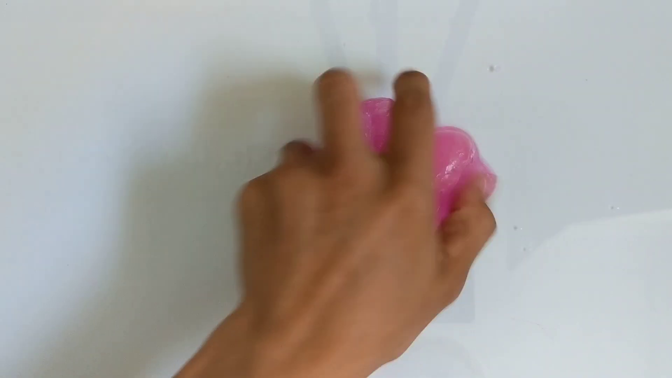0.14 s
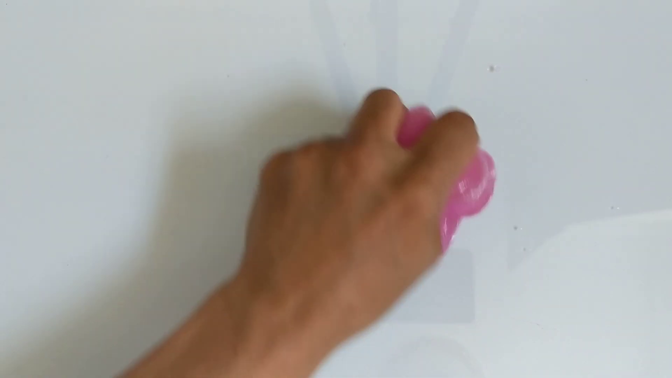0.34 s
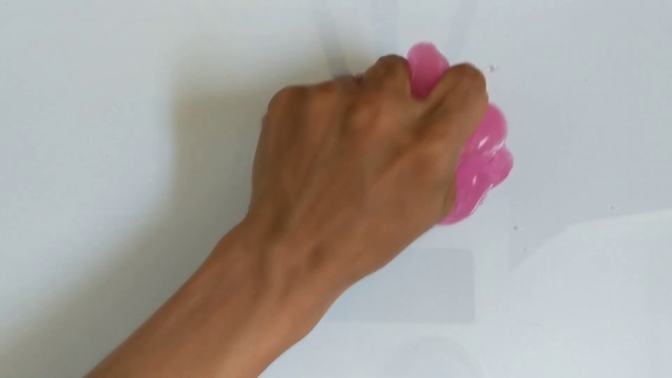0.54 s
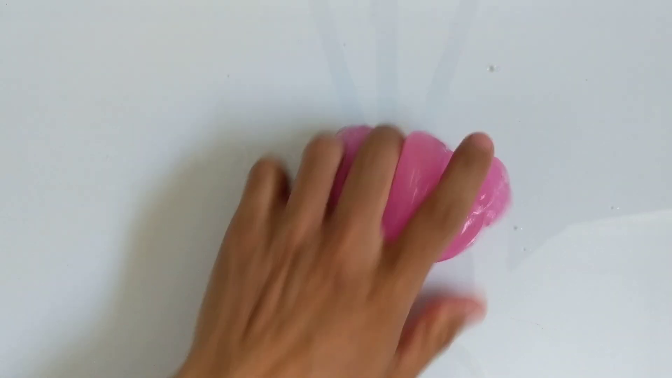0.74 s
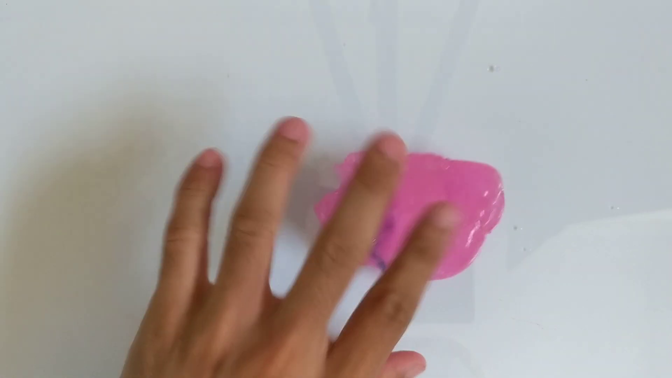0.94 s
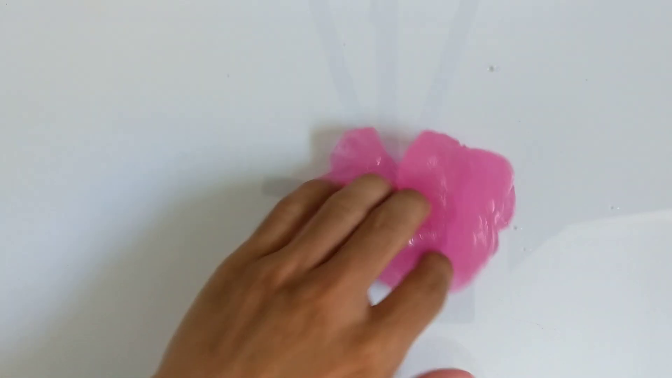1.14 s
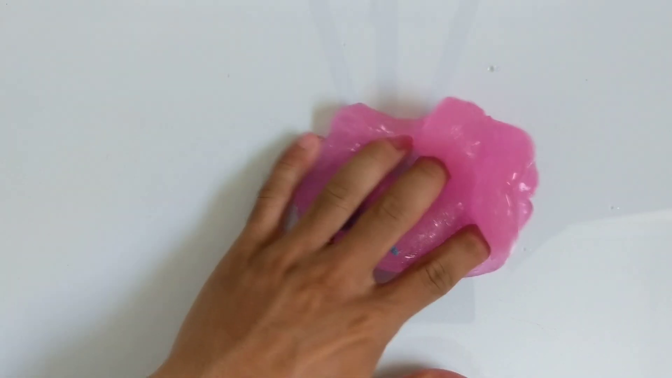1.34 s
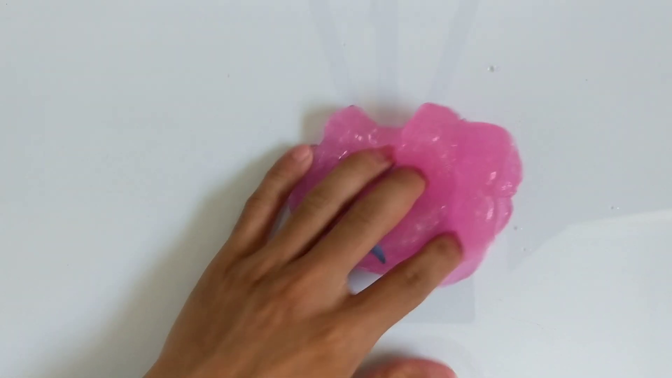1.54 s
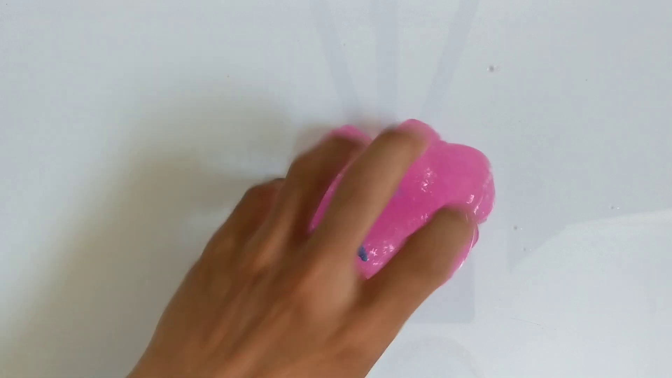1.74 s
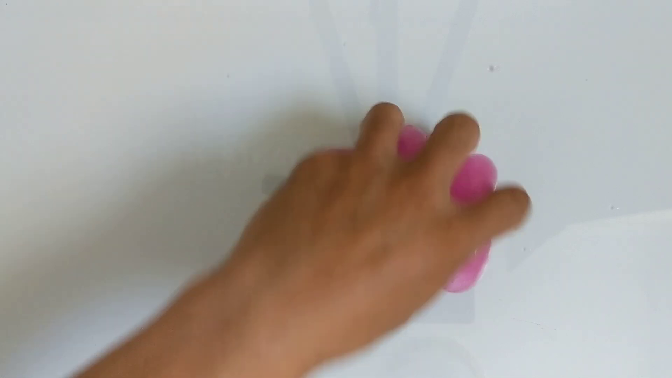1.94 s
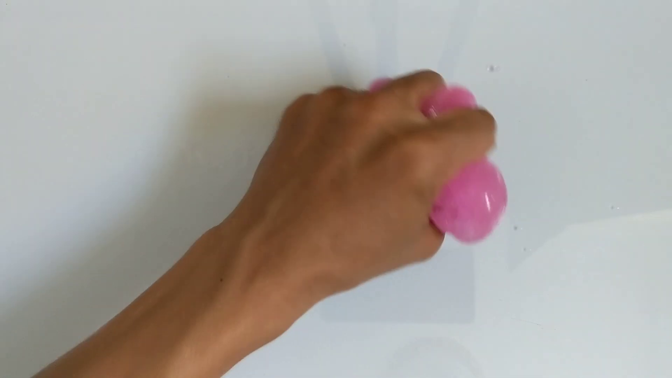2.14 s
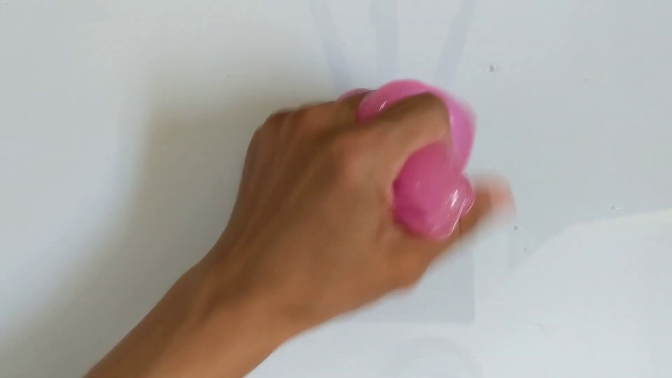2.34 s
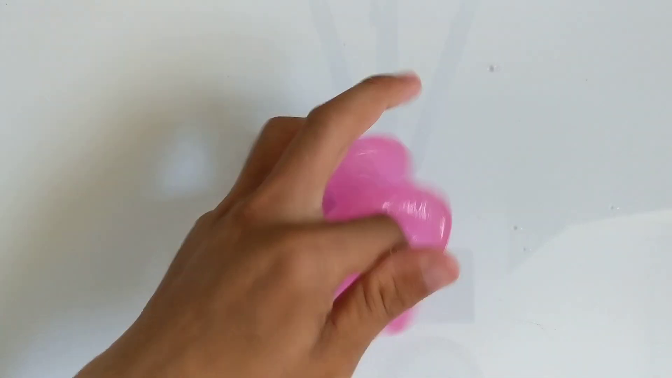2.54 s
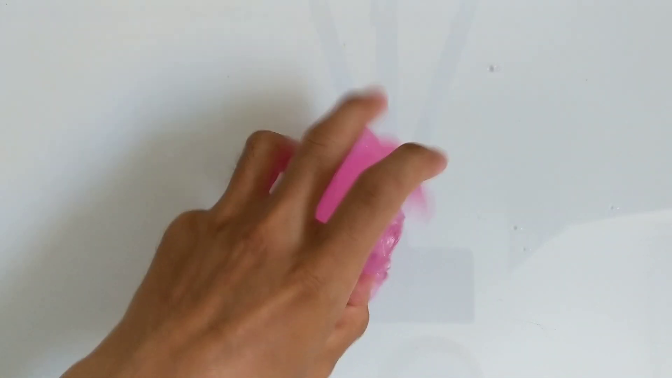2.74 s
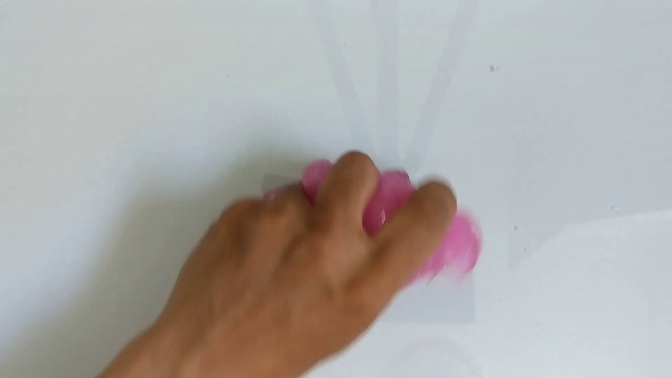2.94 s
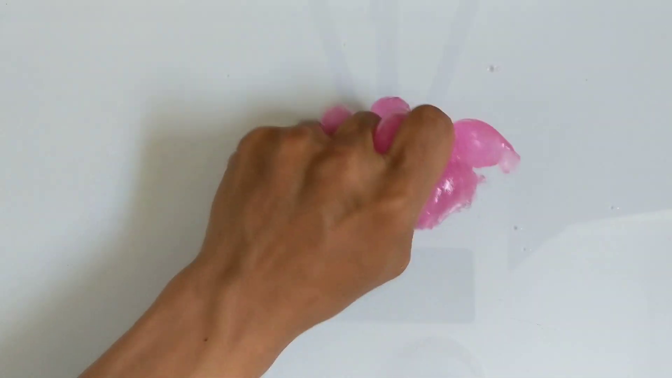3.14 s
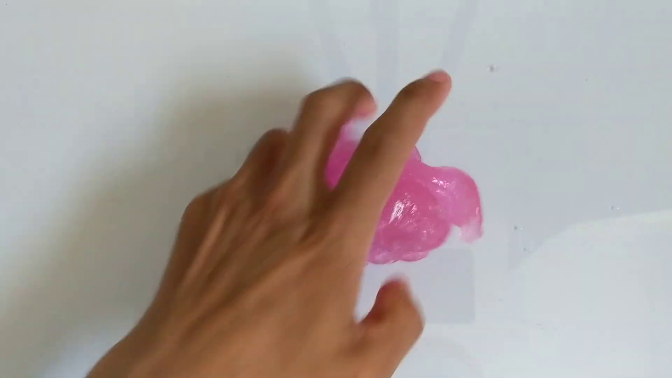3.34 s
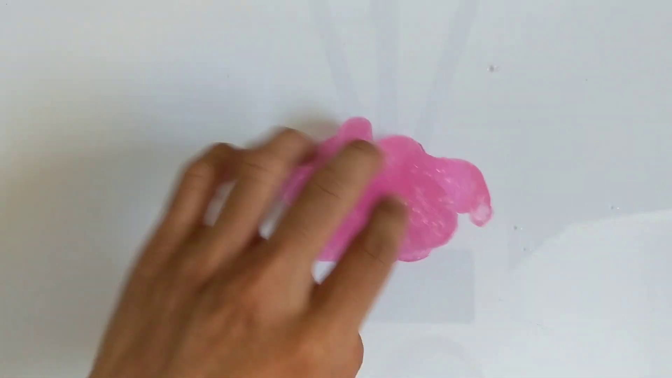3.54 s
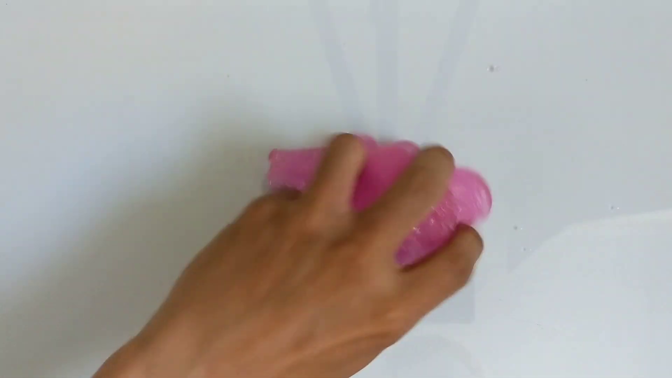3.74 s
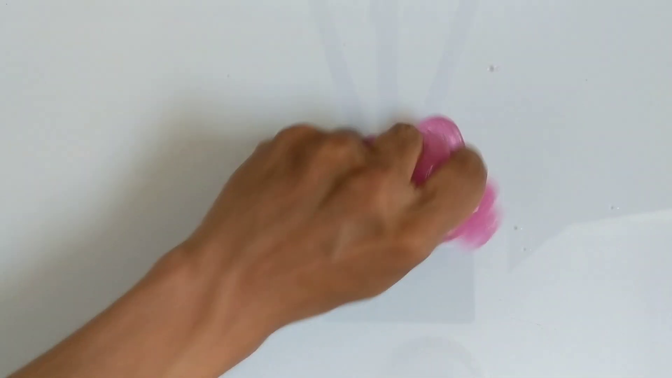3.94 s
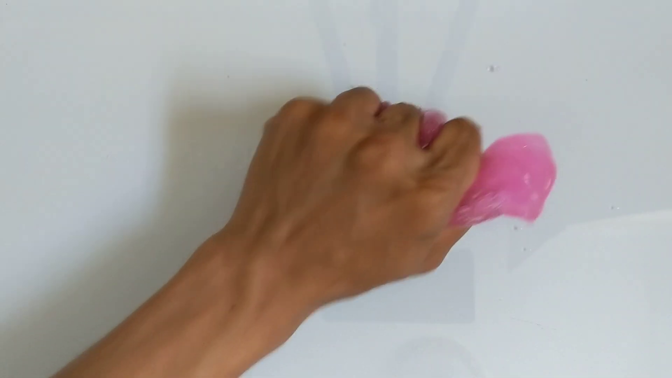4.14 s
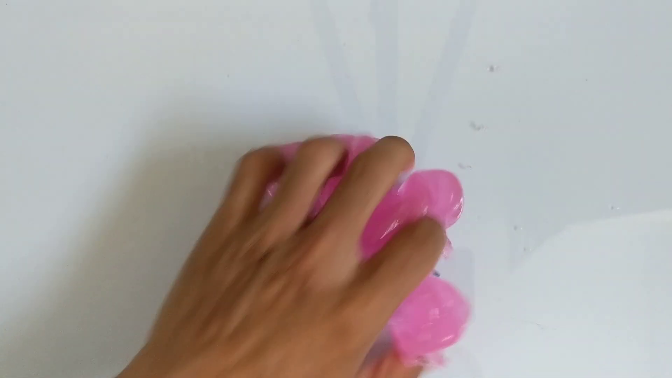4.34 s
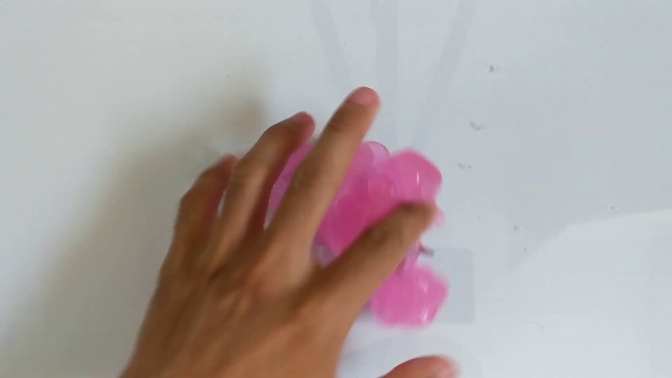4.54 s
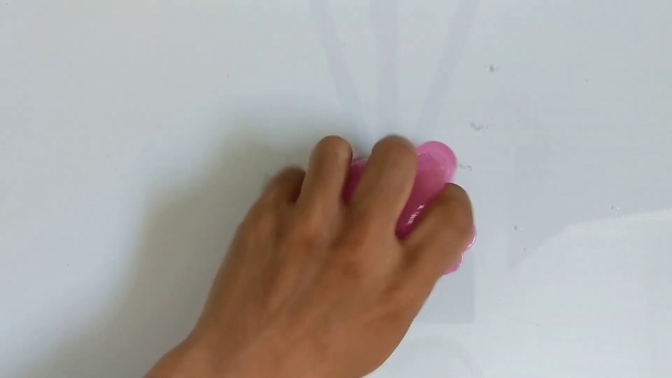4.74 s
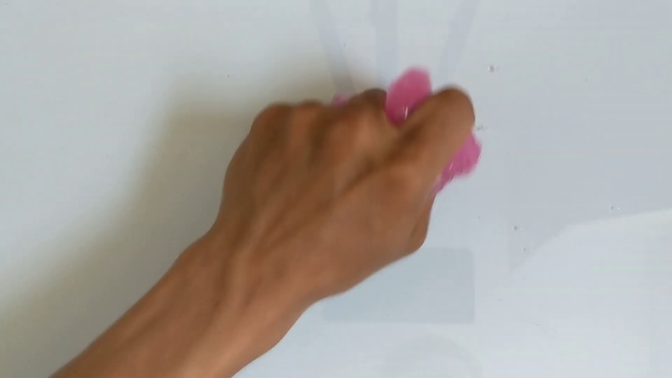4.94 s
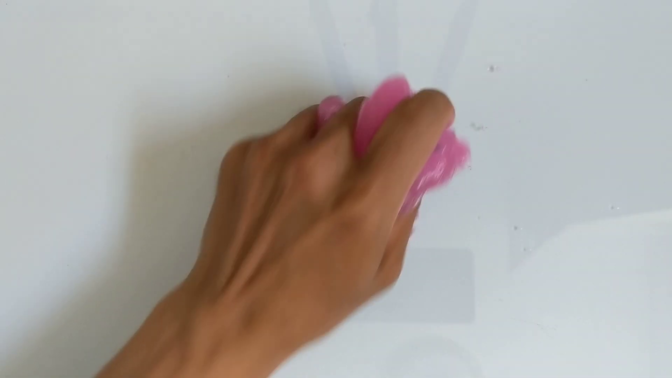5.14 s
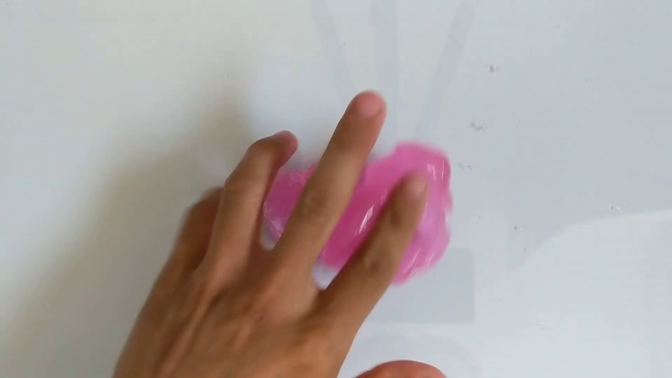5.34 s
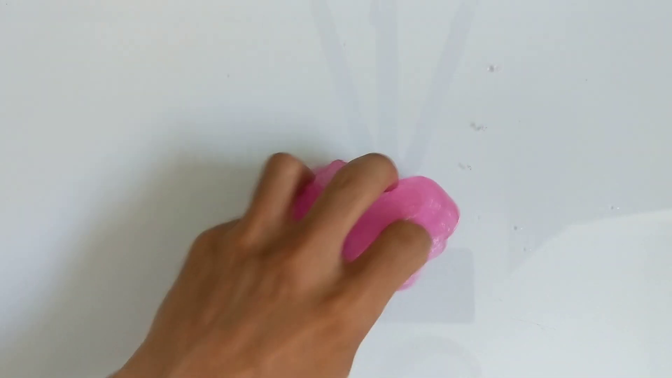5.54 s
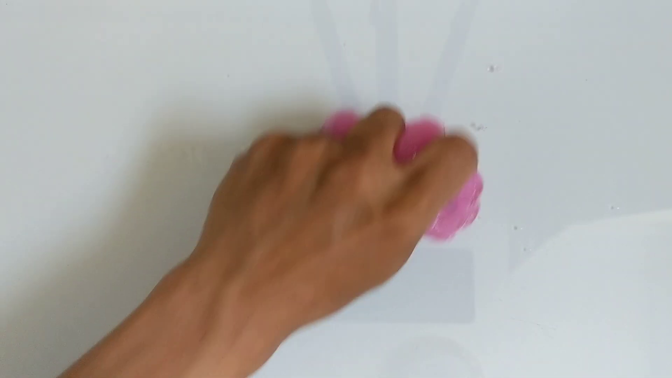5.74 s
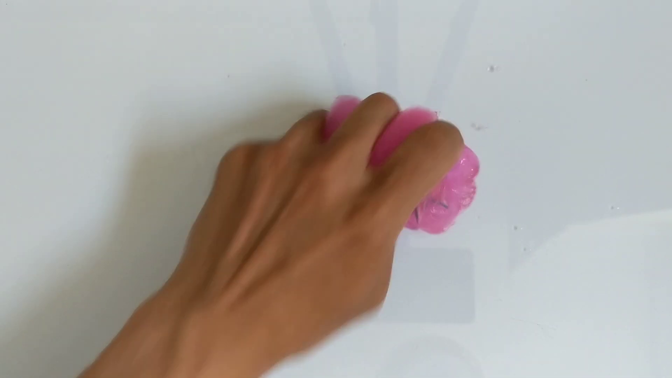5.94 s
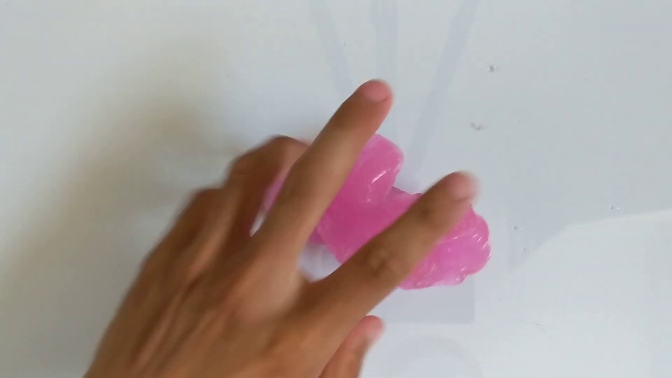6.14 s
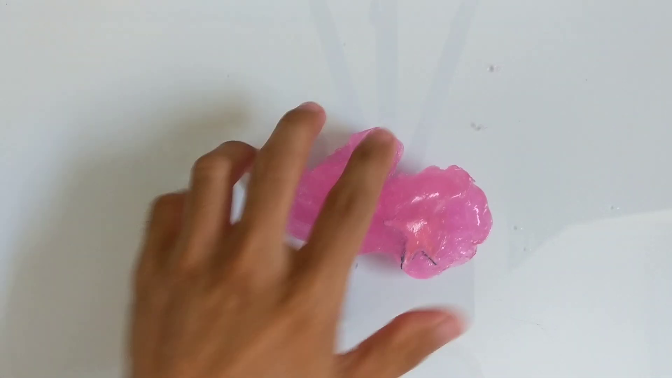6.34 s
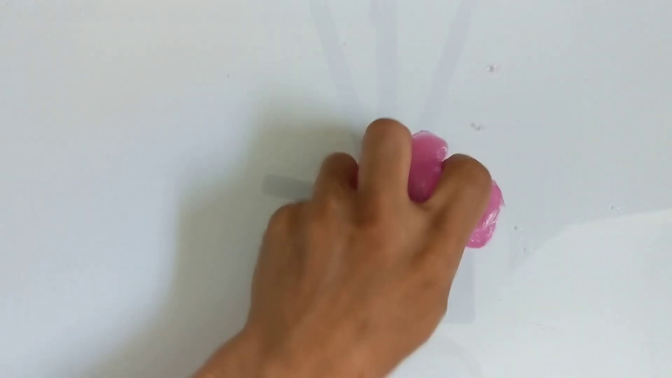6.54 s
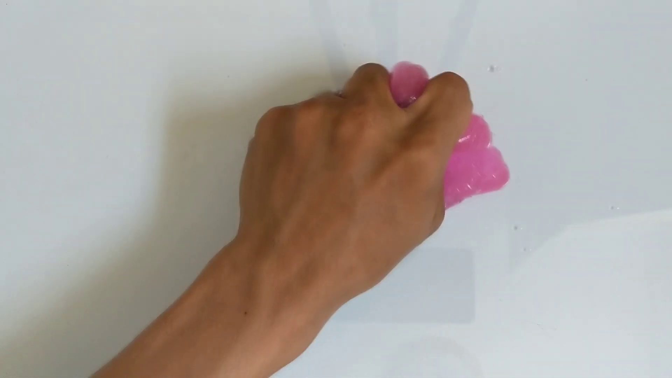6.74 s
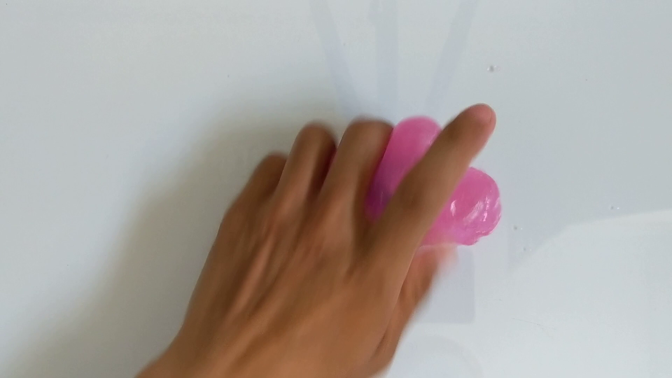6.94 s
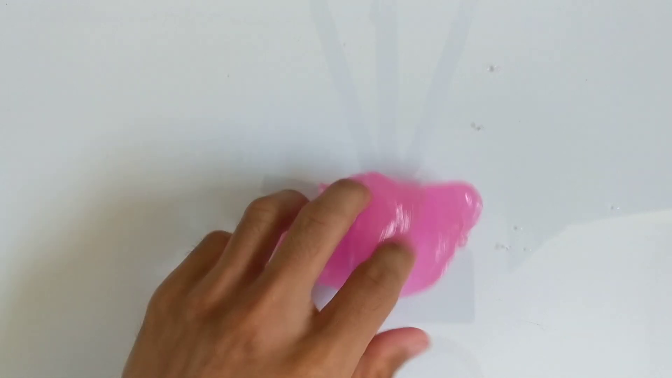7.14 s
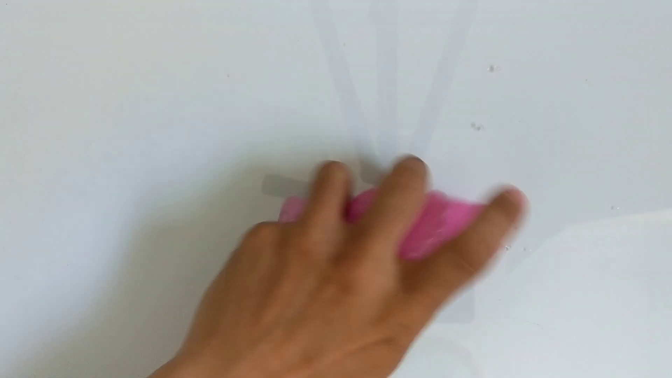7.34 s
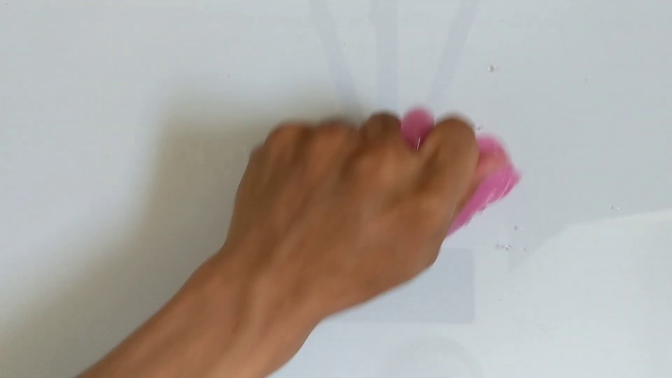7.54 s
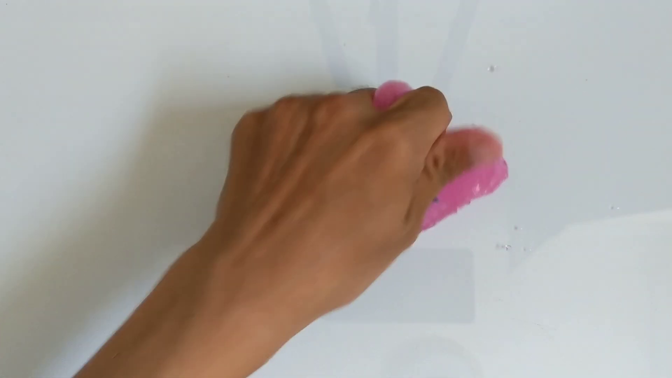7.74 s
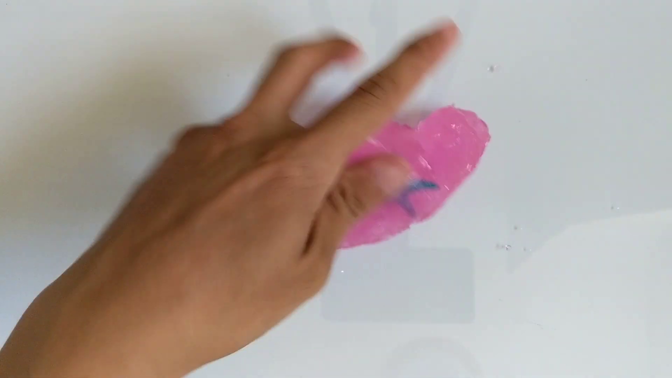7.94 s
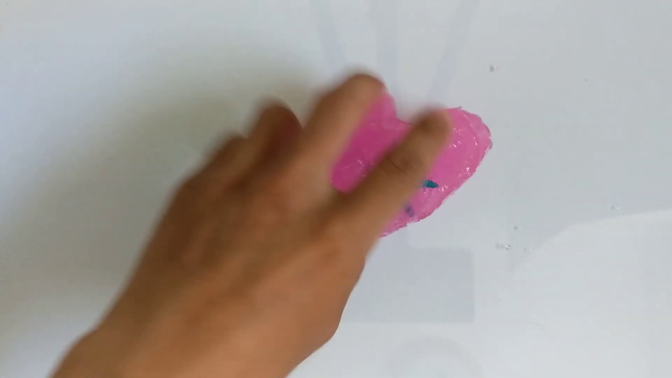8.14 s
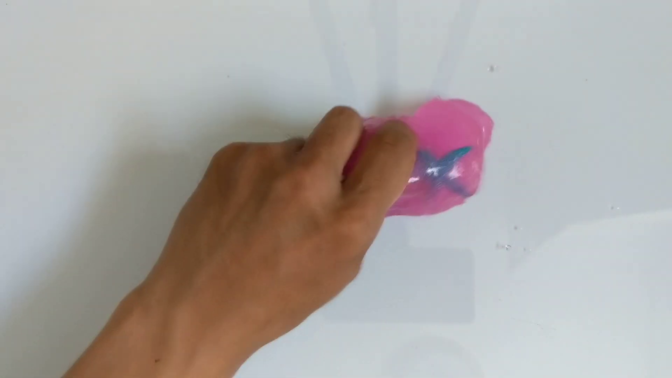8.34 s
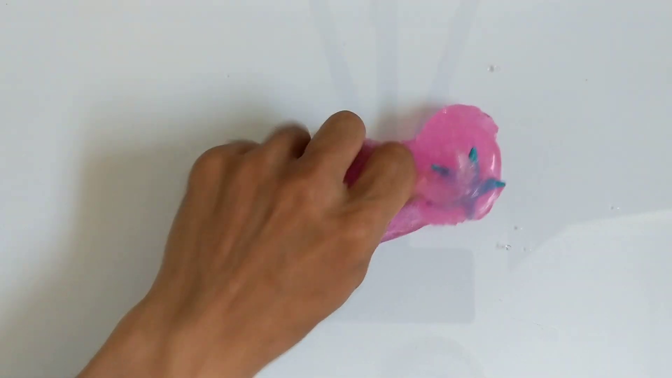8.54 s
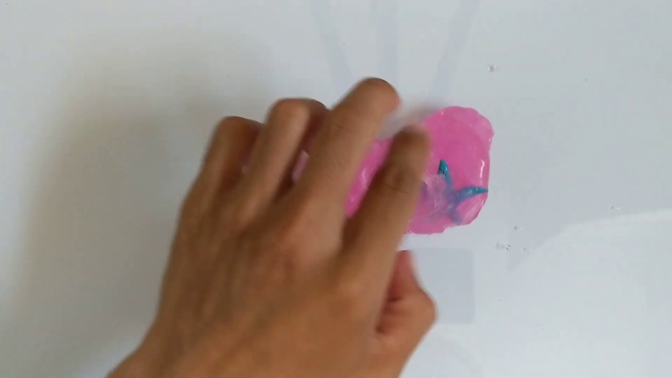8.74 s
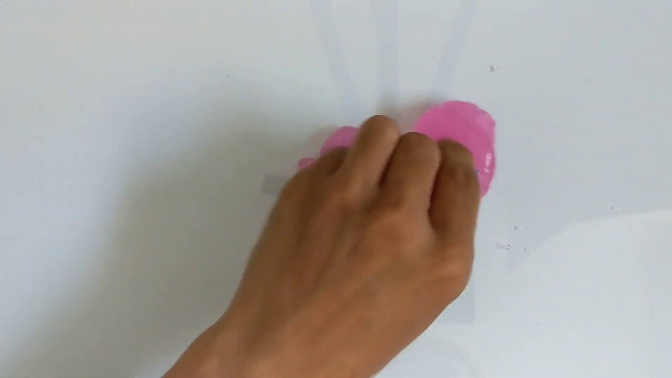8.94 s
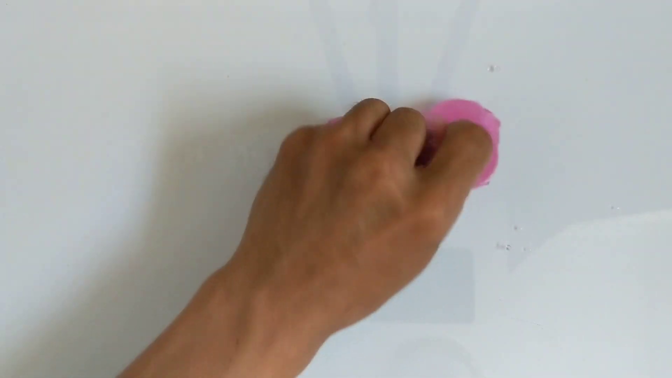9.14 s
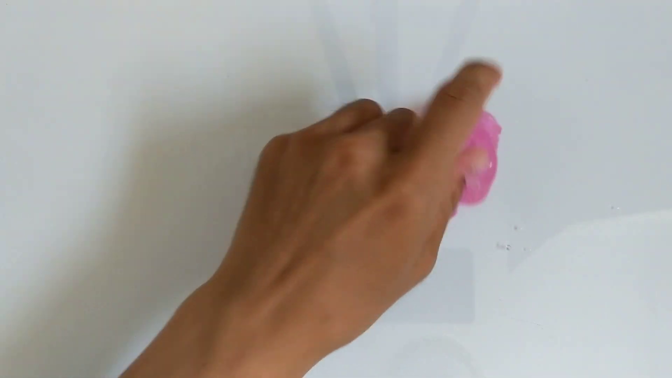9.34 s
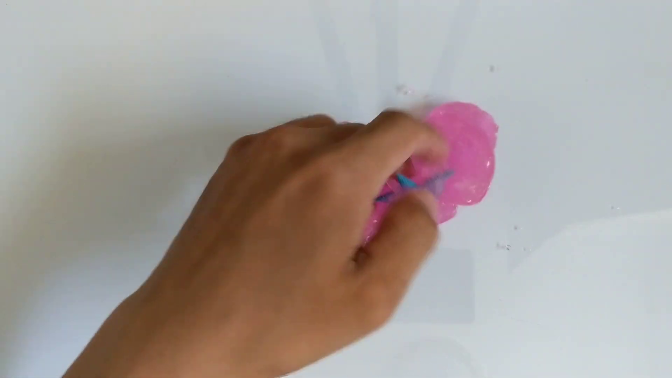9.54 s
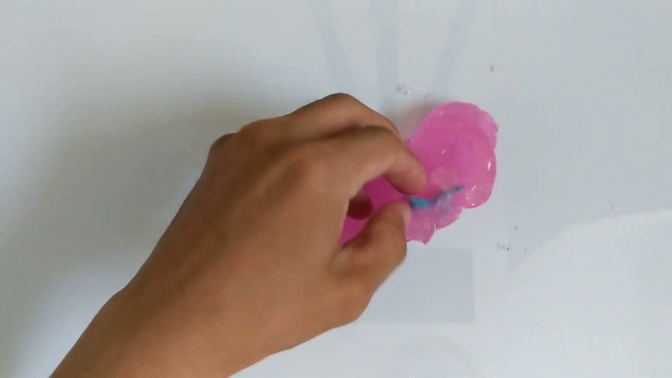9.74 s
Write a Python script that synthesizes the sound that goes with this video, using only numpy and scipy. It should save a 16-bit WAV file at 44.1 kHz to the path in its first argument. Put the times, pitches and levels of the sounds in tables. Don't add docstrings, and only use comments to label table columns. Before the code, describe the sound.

Fingers knead wet sticky slime on a hard table, trapped air bubbles bursting in sharp irregular pops and clicks over squelchy crackle in a bare room.

```python
import sys
import numpy as np
from scipy import signal
from scipy.fft import rfft, irfft, next_fast_len
from scipy.io import wavfile
from scipy.ndimage import map_coordinates

SR = 44100
rng = np.random.default_rng(int(sys.argv[2]) if len(sys.argv) > 2 else 0)


def digitize_waveform(pressure):
    field = np.atleast_2d(pressure).T
    bounded = np.clip(field, -1, 1)
    quanta = np.round(bounded * 32767).astype(np.int16)
    wavfile.write(sys.argv[1], SR, quanta)


def gain_from_decibels(decibels):
    exponent = np.asarray(decibels, float) / 20
    return 10 ** exponent


N = 435266


def unit(x):
    return x / np.sqrt(np.mean(x ** 2) + 1e-20)


def along(points, hz):
    f, v = np.transpose(points)
    return np.interp(np.log(hz + 1), np.log(f + 1), v)


def wobble(rate_hz):
    knots = rng.standard_normal(int(N * rate_hz / SR) + 4)
    return map_coordinates(knots, [np.arange(N) * rate_hz / SR])


def coloured(x, spectrum):
    m = next_fast_len(N + 8192)
    gain = gain_from_decibels(along(spectrum, np.fft.rfftfreq(m, 1 / SR)))
    return irfft(rfft(x, m) * gain, m)[:N]


def bursts(s, db, hz, cycles, rise, onset, size):
    db, hz, cycles = (np.broadcast_to(v, len(s))[:, None] for v in (db, hz, cycles))
    turns = hz * np.arange(size) / SR
    wave = np.sin(2 * np.pi * turns * (1 + rise * turns / cycles))
    wave *= 1 - np.exp(-(turns / onset) ** 2)
    wave *= gain_from_decibels(db - 60 * turns / cycles)
    wave *= np.hanning(2 * size)[size:]
    at = (s * SR).astype(int)[:, None] + np.arange(size)
    return np.bincount(at.ravel(), wave.ravel(), N + SR)[:N]


# (t/s, peak level/dB, f/Hz, ring/cycles, second chamber f/Hz)
SPLIT_POPS = [(1.371, -25, 1170, 2.9, 4670), (1.395, -21, 2980, 5, 5800), (1.4652, -19.5, 5150, 5.5, 8940),
              (2.2517, -28, 6440, 7.8, 10700), (2.442, -36.5, 2760, 7.2, 6930),
              (3.092, -33, 3800, 15, 2010), (3.1003, -17, 4300, 4.2, 6500), (3.102, -19, 4100, 4.2, 6000),
              (3.998, -15, 6470, 4.2, 9450), (4.0828, -22.5, 4960, 6, 2600), (4.09, -31, 5200, 5, 2700),
              (4.176, -31, 11330, 5.6, 6630), (4.91, -18, 3210, 5.5, 5400), (4.919, -30, 3010, 5.1, 4910),
              (5.8278, -17, 4260, 2.06, 1410), (6.571, -29.5, 7190, 2.05, 1050),
              (6.941, -33, 6750, 11.6, 4470), (6.9733, -29, 1180, 6.7, 3140),
              (7.0037, -32, 2600, 6.8, 7600), (7.585, -13.5, 4470, 3.9, 7800),
              (7.644, -17, 2180, 2.26, 5800), (7.6675, -23, 7400, 6, 3920), (6.9796, -25, 1200, 5, 2550),
              (6.9805, -25, 2800, 8, 2500), (3.9996, -17, 6500, 3.5, 9600), (7.5866, -15, 4900, 3.5, 7700),
              (4.9117, -23, 3100, 5, 5500), (4.0405, -25, 4200, 7, 2300), (8.5025, -31, 1700, 2.5, 3300),
              (1.3695, -33, 3100, 4, 6200), (3.982, -28, 3000, 3, 6000), (7.6692, -26, 7500, 5, 4000),
              (6.981, -29, 670, 2.5, 1230)]
# (t/s, peak level/dB, f/Hz, ring/cycles, side chamber f/Hz)
SIDE_POPS = [(0.3828, -26, 7000, 4.4, 3400), (0.7656, -23, 1380, 7.9, 2860), (0.7704, -34, 744, 3, 1410),
             (2.2103, -7.5, 3470, 1.93, 2170), (2.2248, -27, 3300, 2.4, 6030),
             (2.4849, -24.5, 7400, 2.6, 1050), (3.1621, -34, 6200, 5.0, 2930),
             (3.1738, -26.5, 2630, 4.2, 4350), (4.0388, -22, 4180, 7.7, 2220), (4.25, -31, 10100, 13, 5860),
             (4.859, -22.5, 1400, 6.5, 1050), (4.96, -31, 7300, 7.2, 3250), (5.03, -16.5, 2920, 1.3, 1540),
             (5.0721, -23, 3120, 1.9, 4940), (5.7872, -22, 5240, 7, 4500), (6.0692, -23.5, 6760, 2.5, 1390)]
# (t/s, peak level/dB, f/Hz, ring/cycles)
ROUND_POPS = [(1.4178, -30, 9000, 6.1), (1.3945, -25.5, 10400, 9.5), (1.4227, -22, 6200, 4.5),
              (1.4695, -25, 7700, 3.8), (2.242, -29.5, 6000, 18), (2.2828, -16.5, 7060, 4.2),
              (2.291, -31, 6630, 9.4), (3.1967, -20, 9200, 4), (3.199, -32.5, 2560, 5.4),
              (1.4652, -29, 12500, 9), (1.4702, -30, 12000, 9), (2.2106, -28, 12500, 9),
              (1.359, -36, 12000, 5), (4.9072, -33, 9000, 5), (4.919, -33, 8200, 6), (4.955, -35, 7500, 6),
              (4.996, -35, 7800, 6), (3.955, -35, 5500, 9), (6.9812, -32, 3100, 18), (6.9808, -27, 6900, 6),
              (8.5012, -33, 10000, 6), (8.5055, -30, 4450, 6), (8.509, -35, 10500, 6),
              (6.9795, -29, 2490, 18), (6.9775, -30, 1110, 14), (8.411, -38, 8000, 4),
              (8.348, -44, 3900, 10), (9.403, -42, 5000, 5), (3.9547, -25, 2740, 9.5),
              (3.9777, -14.5, 2290, 2.05), (4.1333, -27, 7800, 4), (4.9675, -35, 6100, 5.9),
              (5.792, -30, 5000, 6.2), (5.7708, -31, 8800, 7), (5.7752, -30, 8200, 7),
              (5.8475, -28, 1850, 2), (7.717, -25, 2150, 2.2), (8.4998, -25, 6000, 3.7),
              (8.5032, -26, 7200, 4), (2.1056, -39, 1940, 3.6), (2.1256, -35.5, 2760, 4),
              (5.2654, -42, 1310, 4.3), (5.4844, -32.5, 1250, 1.9), (6.1494, -43, 1860, 6.7),
              (9.2694, -43, 3500, 9.4), (9.1561, -46, 7150, 6), (6.2083, -41, 5020, 5.1),
              (9.2264, -28, 8240, 14)]
SPLIT_DB, SIDE_DB, ROUND_DB = 6.5, -0.5, -11
ROUND_RATIO = 0.55


def pockets():
    split = [row + (SPLIT_DB,) for row in SPLIT_POPS]
    side = [row + (SIDE_DB,) for row in SIDE_POPS]
    plain = [row + (ROUND_RATIO * row[2], ROUND_DB) for row in ROUND_POPS]
    return np.transpose(split + side + plain)


def pops():
    s, db, hz, cycles, second_hz, second_db = pockets()
    main = bursts(s, db + 3.5, hz, 1.61 * cycles, rise=0.0062, onset=0.53, size=500)
    second = bursts(s, db + second_db - 7.5, second_hz, 2.44 * cycles, rise=0.0095, onset=0.77, size=500)
    snap = bursts(s, db - 15.5, np.minimum(2 * hz, 12000), 9.9, rise=0, onset=0.66, size=60)
    push = bursts(s, db - 25, 650, 5.3, rise=0, onset=0.44, size=300)
    return main + second + snap + push


# (t/s, peak level/dB, f/Hz, ring/cycles)
SMACKS = [(0.266, -34.5, 6900, 4), (0.7477, -25, 1280, 3.9), (0.7612, -21, 4500, 2.7),
          (1.2978, -28, 4140, 2.6), (1.66, -31, 2900, 3.2), (2.027, -28, 7140, 3.3), (2.0659, -35, 9100, 4),
          (2.98, -14, 2300, 2.4), (3.0767, -21, 4700, 3.6), (3.8588, -29, 1250, 4.7),
          (3.9123, -33, 4200, 3.6), (3.9618, -30, 2990, 3.8), (4.4918, -27.5, 4770, 5.2),
          (5.7613, -30, 1580, 6.4), (6.0568, -15.5, 1380, 3.9), (6.064, -11.5, 5830, 1),
          (6.4968, -32, 1060, 5.3), (6.6415, -28.5, 9900, 5.6), (6.6932, -21.5, 1630, 5.8),
          (6.7236, -21.5, 905, 3.2), (6.77, -21, 2450, 2.6), (6.9238, -34, 6220, 4),
          (7.9443, -16.5, 1600, 0.8), (8.35, -36, 3000, 2.4), (8.41, -29, 2410, 2.1),
          (8.4514, -26, 5000, 3), (1.3585, -30, 1100, 3), (8.104, -38, 3100, 5), (4.176, -32, 2600, 3),
          (8.4953, -27, 3300, 1.4)]
# (t/s, peak level/dB, f/Hz)
TICKS = [(0.368, -51, 6590), (0.7229, -40, 5170), (0.7555, -36, 7130), (1.2908, -40, 8000),
         (1.349, -39, 5000), (1.359, -31.5, 6060), (2.639, -33.5, 5130), (2.9307, -35, 6360),
         (2.9438, -38, 7000), (3.0415, -35.5, 4370), (3.334, -38, 4140), (3.841, -32.5, 7300),
         (3.9055, -42, 4040), (4.196, -31.5, 3880), (4.2583, -33, 10300), (4.3375, -32.5, 5800),
         (4.8664, -29, 1480), (4.9433, -31, 7450), (5.109, -37, 4860), (5.2317, -41.5, 7400),
         (5.6648, -46, 4930), (5.6806, -41, 3060), (6.5756, -37, 5900), (6.948, -30, 6430),
         (7.387, -46, 2690), (7.566, -41, 9950), (8.0646, -39.5, 10530), (8.802, -36.5, 5900),
         (9.1873, -43.5, 3790), (9.3903, -43, 6340)]
TICK_CYCLES = 13.5


def ticks():
    ringing = [row + (TICK_CYCLES,) for row in TICKS]
    s, db, hz, cycles = np.transpose(SMACKS + ringing)
    ring = bursts(s, db + 1.5, hz, 0.87 * np.maximum(cycles, 1), rise=0.015, onset=1, size=300)
    snap = bursts(s, db - 3, np.sqrt(hz * 5000), 2.9, rise=0, onset=0.38, size=60)
    return ring + snap


# (t/s, length/s, level/dB, fold f/Hz, second resonance f/Hz)
SPUTTERS = [(.766, 0.013, -43, 1450, 2800), (.82, 0.036, -50, 1480, 1830),
            (1.385, 0.027, -45.5, 1130, 2600), (1.71, 0.022, -53, 1960, 2300),
            (2.286, 0.013, -36.5, 6700, 8500), (2.495, 0.022, -44, 1515, 2810),
            (.381, .026, -43, 6900, 3300), (5.32, 0.042, -49.5, 2170, 2860),
            (6.822, 0.036, -37, 1230, 2650), (6.972, .016, -36, 1120, 2900), (6.973, .016, -40, 2500, 2850),
            (7.755, 0.019, -45.5, 1510, 2340), (7.938, 0.025, -48.5, 3280, 1690),
            (8.063, 0.018, -51, 4200, 3300), (8.499, .009, -40, 5300, 6700), (8.47, 0.018, -47, 6540, 5000),
            (5.821, .012, -36.5, 6240, 4260), (5.768, .016, -45, 8200, 6500)]


def sputters(count=24):
    s, length_s, db, hz, other_hz = np.repeat(SPUTTERS, count, axis=0).T
    a, b, luck, detune = rng.random((len(s), 4)).T
    when = s + length_s * (a + b) / 2
    level_db = db + 6 * (luck - 0.5)
    hz = hz * (1 + 0.09 * (detune - 0.5))
    other_hz = other_hz * (1 + 0.36 * (detune - 0.5))
    lower = bursts(when, level_db, hz, 15, rise=0, onset=1, size=400)
    upper = bursts(when, level_db + 1.5, other_hz, 8, rise=0, onset=0.99, size=200)
    return lower + upper


# (t/s, hold/s, effort level/dB, wetness/dB)
SQUEEZES = [(0.304, 0.04, -57, 4.5), (0.39, 0.02, -49, 3), (0.763, 0.016, -46, 2), (1.29, .02, -51, 1),
            (1.365, .06, -48, 0.5), (2.039, 0.089, -50, -1), (2.222, 0.0092, -42, -17),
            (2.941, .02, -51.5, 1), (3.094, 0.017, -42, -4), (3.856, 0.1, -56, 1.5),
            (3.967, 0.076, -44, -3.5), (4.849, 0.088, -50, 0), (5.68, .01, -54, 2.5),
            (5.782, 0.064, -46.5, 1.5), (6.071, 0.007, -46, 3), (6.586, 0.058, -50.5, -2),
            (6.97, 0.029, -44.5, -15), (7.592, 0.085, -49.5, 7), (8.348, 0.19, -58, 2.5),
            (9.211, 0.014, -49, -5)]
# (t/s of most pull, effort level/dB, wetness/dB)
PEELS = [(0.001, -55, 0.5), (.58, -54.5, 0), (1.72, -53, -2), (2.51, -48.5, -3.5), (2.68, -59.5, 3.5),
         (2.86, -61.5, -0.5), (3.4, -51, 1.5), (4.398, -48.5, 2.5), (4.81, -63.5, 5.5), (5.08, -55, 5),
         (5.32, -51, 3.5), (5.55, -71.5, 9), (6.8, -55, 7.5), (7.28, -57.5, -2), (7.45, -65, 2),
         (7.958, -52, 0.5), (8.08, -64, -12), (8.73, -56.5, -1), (9.1, -66.5, -13), (9.41, -57, -6)]
DIG_DB_S, PULL_DB_S = 431, 95


def effort(wet_share, fade_db_s):
    t = np.arange(N) / SR
    strokes = [row + (DIG_DB_S,) for row in SQUEEZES]
    strokes += [(s, 0, db, wet, PULL_DB_S) for s, db, wet in PEELS]
    power = np.zeros(N)
    for s, hold_s, db, wet_db, swell_db_s in strokes:
        before_db = swell_db_s * np.maximum(s - t, 0)
        after_db = fade_db_s * np.maximum(t - s - hold_s, 0)
        power += gain_from_decibels(db + wet_share * wet_db - before_db - after_db) ** 2
    return np.sqrt(power)


def grains(typical_hz, octaves, scatter_db, clumps_db, count, size):
    when, luck, life = rng.random((count, 3)).T
    i = (when * (N - 1)).astype(int)
    hz = typical_hz * 2 ** (octaves * rng.standard_normal(count) + 0.25 * wobble(18)[i])
    hz = np.clip(hz, 300, 15000)
    level_db = -scatter_db * np.log(luck) + clumps_db[i] + 10 * np.log10(hz)
    return unit(bursts(i / SR, level_db, hz, 4 + 9 * life, rise=0.05, onset=0.8, size=size))


def crackle():
    shared_db = 1.8 * wobble(50)
    squelch = grains(1500, octaves=0.8, scatter_db=1.2, clumps_db=shared_db + 1.5 * wobble(40),
                     count=9000, size=260)
    fizz = grains(5800, octaves=0.62, scatter_db=1.8, clumps_db=shared_db + 1.5 * wobble(40),
                  count=30000, size=90)
    squelch *= gain_from_decibels(-10) * effort(wet_share=0.85, fade_db_s=152)
    fizz *= gain_from_decibels(-12) * effort(wet_share=0, fade_db_s=127)
    return squelch + fizz


# (t/s, level/dB, f/Hz, length/s, octave level/dB)
SQUEAKS = [
    (0.6202, -42, 2850, 0.0035, 1.5),
    (5.419, -52, 3730, 0.005, -12),
    (6.803, -44.5, 7240, 0.0043, 5),
    (3.3405, -35, 6100, .0026, -30),
    (3.3432, -43, 4700, .002, -30),
    (3.3757, -33, 1400, .0052, -30),
    (3.3762, -36, 1750, .004, -30),
    (8.0472, -52, 2250, .003, -20),
    (8.456, -48, 2700, .004, -20),
]


def squeaks():
    out = np.zeros(N)
    flutter = gain_from_decibels(0.94 * wobble(400))
    for s, db, hz, length_s, upper_db in SQUEAKS:
        t = np.arange(int(length_s * SR)) / SR
        tone = np.sin(2 * np.pi * hz * t)
        tone += gain_from_decibels(upper_db) * np.sin(2 * np.pi * 1.98 * hz * t)
        out[int(s * SR):][:len(t)] += gain_from_decibels(db) * tone * signal.windows.tukey(len(t), 0.5)
    return out * flutter


# (delay t/s, level/dB)
NEAR = [(.0017, -8), (.0034, -14), (.0047, -13), (.0069, -16), (.0098, -17)]


def repeated(x):
    early = np.zeros(SR // 10)
    early[0] = 1
    for delay_s, db in NEAR:
        early[int(delay_s * SR)] += gain_from_decibels(db)
    return signal.fftconvolve(x, early)[:N]


# (f/Hz, t60/s)
ROOM = [(300, .65), (1200, .62), (3000, .56), (7000, .5), (14000, .4)]
# (f/Hz, level/dB)
LATE = [(300, 1), (1200, 1), (5000, 0.5), (7500, -1.5), (10500, -2), (14000, -2)]


def tail():
    hz, t, z = signal.stft(rng.standard_normal(SR), SR, nperseg=256)
    decay = gain_from_decibels(-60 * t / along(ROOM, hz)[:, None])
    decay *= (gain_from_decibels(along(LATE, hz)) / np.linalg.norm(decay, axis=1))[:, None]
    late = signal.istft(z * decay, SR, nperseg=256)[1][:SR] / np.sqrt(128)
    return late * (1 - np.exp(-np.arange(SR) / SR / 0.002))


def room(x, count=5):
    place = np.arange(N) // 4000 % count
    return sum(signal.fftconvolve(x * (place == k), tail())[:N] for k in range(count))


# (t/s, rumble level/dB)
RUMBLE = [(0.0, -56.5), (0.41, -54.5), (1.18, -55.5), (2.36, -54), (2.78, -58), (4.37, -54.5), (5.09, -57),
          (5.41, -50.5), (5.47, -52.5), (8.08, -60.5), (8.25, -58), (9.87, -62.5)]
# (f/Hz, level/dB per Hz)
LOW = [(12, -31), (20, 3), (64, -7), (102, 3), (193, -7), (225, -20), (264, -16), (400, -17), (520, -34),
       (880, -120)]
# (f/Hz, level/dB per Hz)
HISS = [(150, -21), (250, -4), (357, -5.5), (518, -5), (794, -9), (899, -7.5), (2110, -15), (3790, -17.5),
        (4700, -19), (17500, -26.5)]
HISS_DB = -62.5
DRONE_S, DRONE_LENGTH_S, DRONE_DB, DRONE_HZ = 8.88, 0.65, -67, 259


def background():
    t = np.arange(N) / SR
    rumble_db = np.interp(t, *np.transpose(RUMBLE)) + 0.81 * wobble(4)
    rumble = gain_from_decibels(rumble_db) * unit(coloured(rng.standard_normal(N), LOW))
    to_edge_s = np.minimum(t - DRONE_S, DRONE_S + DRONE_LENGTH_S - t)
    passing = np.clip(to_edge_s / 0.07, 0, 1)
    drone_turns = np.cumsum(DRONE_HZ + 1.32 * wobble(8)) / SR
    drone = gain_from_decibels(DRONE_DB) * passing * np.sin(2 * np.pi * drone_turns)
    hiss_db = HISS_DB + 0.69 * wobble(1.807)
    hiss = gain_from_decibels(hiss_db) * unit(coloured(rng.standard_normal(N), HISS))
    return rumble + drone + hiss


# (f/Hz, level/dB)
MIC = [(60, -60), (200, 13), (500, -0.5), (1000, 2), (8000, 9), (12000, 8), (16000, 7.5)]


def scene():
    whistling = coloured(squeaks(), MIC)
    bursting = coloured(pops() + ticks() + sputters(), MIC)
    peeling = coloured(crackle(), MIC)
    direct = repeated(bursting) + whistling + gain_from_decibels(3) * peeling
    late = gain_from_decibels(-1) * room(bursting + gain_from_decibels(-5) * whistling + peeling)
    return (direct + late + background())[None]


def low_pass(x):
    return signal.sosfilt(signal.butter(12, 18230, fs=SR, output="sos"), x)


# (f/Hz, level/dB)
EDGES = [(18, -45), (28, -23), (40, 0.5), (16800, 2.5), (17200, -4), (18200, -32), (19000, -60)]


def record(dry):
    mix = coloured(dry[0], EDGES)[None]
    return low_pass(mix)


dry = scene()
out = record(dry)
digitize_waveform(out)
```